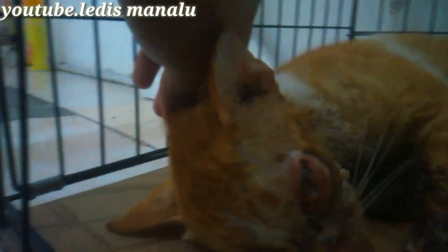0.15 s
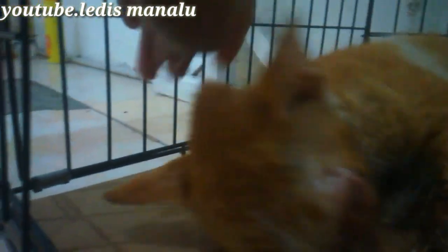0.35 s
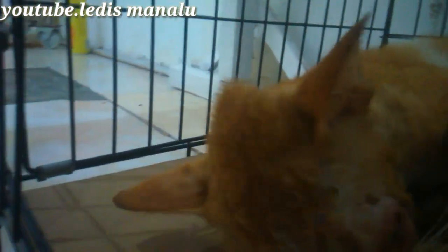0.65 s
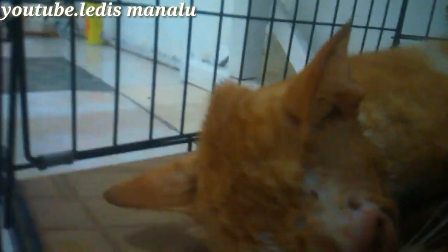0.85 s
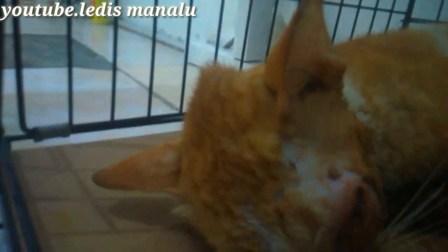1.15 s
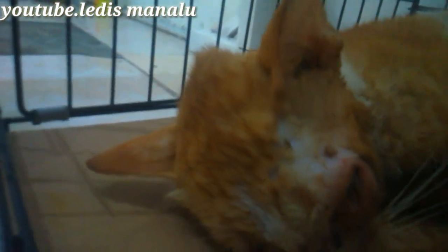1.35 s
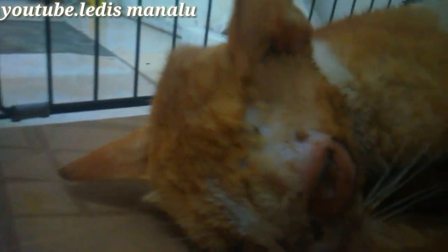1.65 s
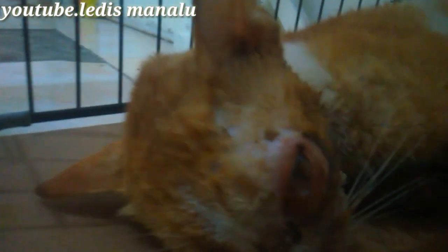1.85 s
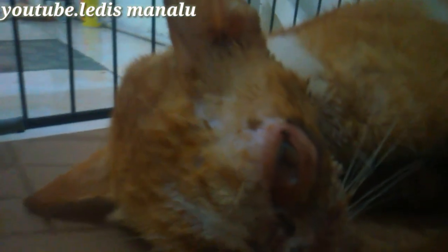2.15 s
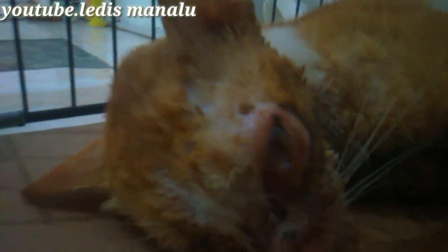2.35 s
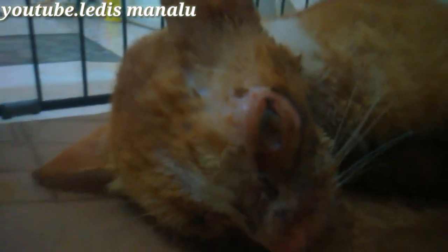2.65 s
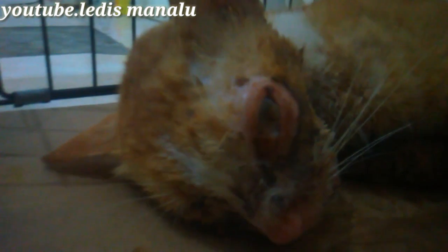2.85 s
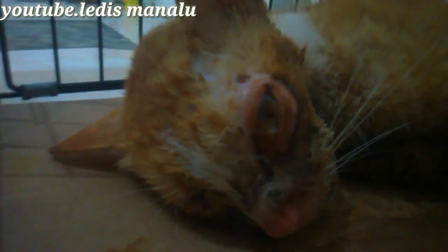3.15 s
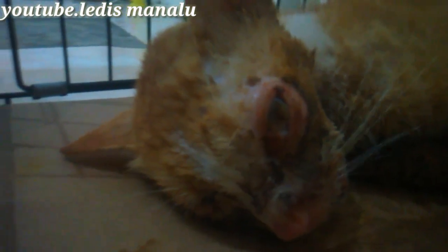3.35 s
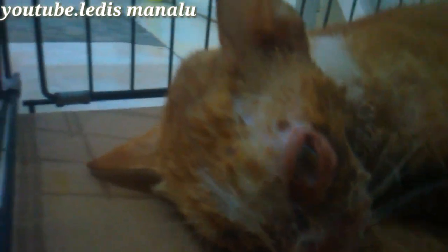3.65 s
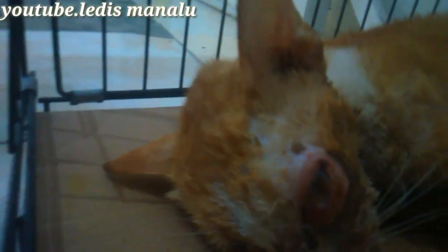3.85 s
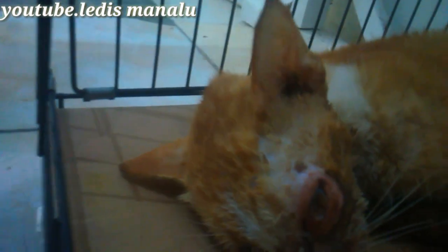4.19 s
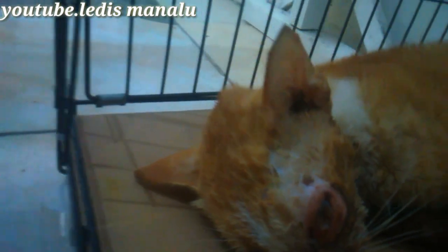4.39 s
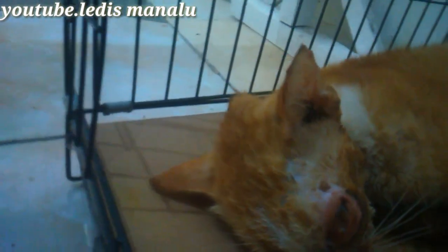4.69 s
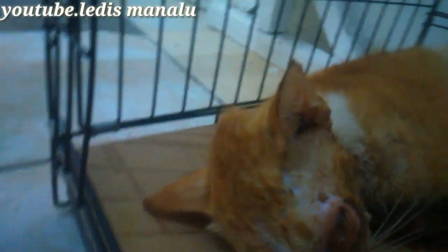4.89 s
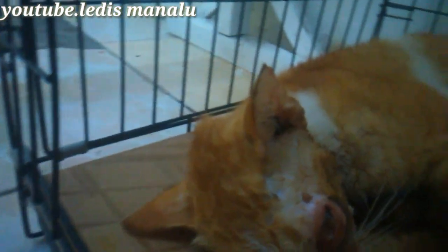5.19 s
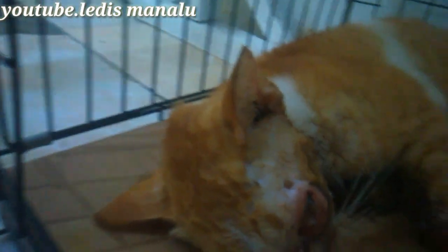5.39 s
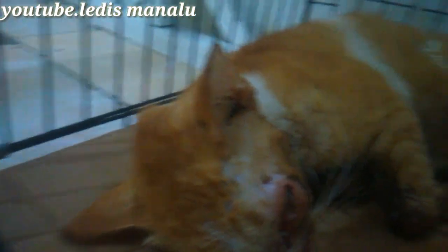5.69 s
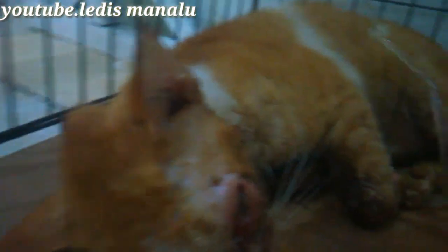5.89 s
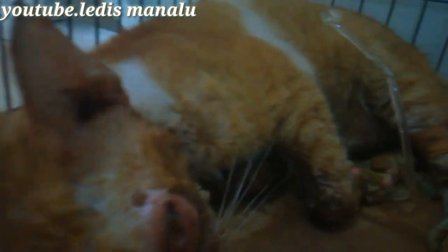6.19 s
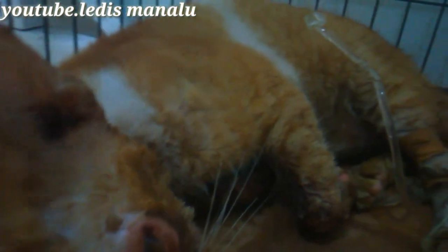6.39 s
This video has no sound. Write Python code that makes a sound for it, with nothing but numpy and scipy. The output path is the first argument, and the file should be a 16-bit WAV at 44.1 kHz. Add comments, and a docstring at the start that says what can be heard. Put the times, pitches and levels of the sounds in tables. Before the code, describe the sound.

A close stereo pickup of a cat's purr in a hard-floored room: a deep, rapid throb of over twenty pulses a second, much like an idling diesel. From 0 to 1.5 s it is moderate and fluttering, with short dips and soft bright brushes at about 0.7, 1.1 and 1.2 s. Tiny wire clicks fall at 1.5 and 1.6 s, with dull bumps at 1.6 and 1.8 s amid brief low surges. From 2 s the pulse speeds up and thickens; a rough whine rises, strongest around 3.3 s, with rushing mid noise and a thin whistle. After 3.8 s it slows, the hiss drops away, and a bump at 4.1 s leads into rounded low booms until about 4.9 s. It is quietest near 5 s, then quickens and the deep throb and hiss return, with a faint bump at 6.3 s before the end.

```python
"""Diesel rumble in a tiled clinic room

Beside a caged cat a low purring rumble throbs like a diesel engine outside: it speeds up and passes
with a whine, eases off for a gear change and pulls again. One shaft angle drives tones, boom and exhaust
noise; the room's low modes ring with the boom. Shaped noise makes the tyres, clatter, hiss and still air;
short noise bursts make bumps and faint ticks of fur and cage."""
import sys
import numpy as np
from scipy import signal
from scipy.fft import rfft, irfft, next_fast_len
from scipy.io import wavfile
from scipy.ndimage import uniform_filter1d, map_coordinates

SR = 44100
rng = np.random.default_rng(int(sys.argv[2]) if len(sys.argv) > 2 else 0)


def to_wav(sig):
    """Store sig (one row per channel, or 1-D mono) as 16-bit WAV at the path in sys.argv[1].

    Samples outside -1..1 are clipped; the rate is SR.
    """
    pcm = np.clip(np.atleast_2d(sig), -1, 1) * 32767
    pcm = np.round(pcm).astype(np.int16)
    wavfile.write(sys.argv[1], SR, pcm.T)  # frames by channels


N = 287973


def amp(db):
    """Decibels to linear gain."""
    return 10 ** (np.asarray(db) / 20)


def unit(x):
    """Scale to rms 1."""
    return x / np.sqrt(np.mean(x ** 2) + 1e-20)


def along(points, hz):
    """Read (hz, value) points along a log frequency axis."""
    point_hz, values = np.transpose(points)
    return np.interp(np.log(hz + 1), np.log(point_hz + 1), values)


def curves(rows, glide_s=0.006):
    """One gliding value per sample for each column after the time."""
    time_s, *columns = np.transpose(rows)
    t = np.arange(N) / SR
    return [uniform_filter1d(np.interp(t, time_s, c), int(glide_s * SR) + 1) for c in columns]


def wobble(rate_hz):
    """A smooth random curve with rate_hz knots a second."""
    knots = rng.standard_normal(int(N * rate_hz / SR) + 4)
    return map_coordinates(knots, [np.arange(N) * rate_hz / SR])


def swell(middle_s, length_s):
    """A rounded rise and fall: half a cosine over the length."""
    return np.cos(np.pi * np.clip((np.arange(N) / SR - middle_s) / length_s, -.5, .5))


def filtered(x, response):
    """Filter x by a complex response of frequency, zero-padded against wrap-around."""
    m = next_fast_len(N + SR // 2)
    return irfft(rfft(x, m) * response(np.fft.rfftfreq(m, 1 / SR)), m)[..., :N]


def coloured(x, spectrum):
    """Shape x by a spectrum and bring it to rms 1."""
    return unit(filtered(x, lambda hz: amp(along(spectrum, hz))))


def diffuse():
    """Stereo room noise: alike in the bass, mostly unrelated in the treble."""
    # left-right likeness: pitch_hz [Hz], correlation [0 to 1]
    likeness = [(60, 1), (130, 0.93), (290, 0.75), (640, 0), (1400, 0.34), (3000, 0), (15000, 0.034)]

    def mid_side(hz):
        turn = np.arccos(np.clip(along(likeness, hz), -1, 1)) / 2
        return np.array([np.cos(turn), np.sin(turn)])

    mid, side = filtered(rng.standard_normal((2, N)), mid_side)
    return np.array([mid + side, mid - side])


def steadied(x, seconds):
    """Even out the level of x to about 1 over spans longer than the given time."""
    power = uniform_filter1d(np.mean(x ** 2, axis=0), max(int(seconds * SR), 64))
    return x / np.sqrt(np.abs(uniform_filter1d(power, SR // 50)) + 1e-9)


def narrow(phase, half_width_hz):
    """Stereo noise of rms 1 in a narrow band: slow random signals modulate a tone."""
    def slow():
        return filtered(rng.standard_normal((3, N)), lambda hz: 1 / (1 + (hz / half_width_hz) ** 4))

    left, right, both = slow() * np.cos(phase) + slow() * np.sin(phase)
    return unit(np.array([left + both, right + both]))


def patchy(x, depth_db, size=1024):
    """Let narrow time-frequency patches of x come and go at random."""
    z = signal.stft(x, nperseg=size)[2]
    field = uniform_filter1d(rng.standard_normal(z.shape[1:]), size=3, axis=0)
    field = uniform_filter1d(field, size=14, axis=1)
    return signal.istft(z * amp(depth_db * unit(field)), nperseg=size)[1][:, :N]


def bursts(rows, attack_s):
    """Envelope of short exponentially dying bursts, one per (start, level, t60) row."""
    t = np.arange(SR // 4) / SR
    envelope = np.zeros(N + SR)
    for start_s, level_db, t60_s in rows:
        shape = amp(level_db - 60 * t / t60_s) * (1 - np.exp(-t / attack_s))
        envelope[round(start_s * SR):][:len(t)] += shape
    return envelope[:N]


def puffs(angle, depth_db):
    """Noise that swells once with each turn of the shaft."""
    return diffuse() * amp(depth_db * np.cos(angle))


def cycle(angle, size=128):
    """A random exhaust waveform that comes back every two turns of the shaft."""
    pattern = rng.standard_normal(size)
    return unit(map_coordinates(pattern, [angle / (4 * np.pi) % 1 * size], mode="grid-wrap"))


def beats(angle, scatter_db, count=256):
    """Random strength for each turn of the shaft, gliding from one to the next."""
    return amp(scatter_db * np.interp(angle / (2 * np.pi), np.arange(count), rng.standard_normal(count)))


def low_orders(angle, flutter_db=1.64):
    """Exhaust tones at shaft multiples; the higher crest later, so each turn sweeps slightly upward."""
    # tones at 4, 5 and 6 times shaft speed: time_s [s], level_db [dB before flutter and beats]
    fourth_levels = [(0, -48), (1.3, -47), (1.7, -34), (1.85, -27), (2.2, -45), (2.47, -40), (2.589, -16.5),
                     (2.72, -39), (3.1, -36), (3.3, -16), (3.45, -14.5), (3.62, -18.5), (3.73, -31),
                     (3.9, -31), (3.99, -18), (4.1, -41), (4.95, -44.5), (5.43, -31), (6.0, -32),
                     (6.13, -37), (6.3, -33), (6.42, -30.5), (6.53, -18)]
    fifth_levels = [(0.13, -44), (0.32, -23), (0.57, -35), (0.63, -19.5), (0.85, -24.5), (0.94, -32),
                    (1.07, -19.5), (1.17, -32.5), (1.25, -28), (1.5, -24.5), (1.57, -39.5), (1.87, -15),
                    (2.06, -28), (2.22, -20.5), (2.42, -39.5), (2.72, -20.5), (2.98, -19.5), (3.3, -31.5),
                    (4.1, -39), (4.58, -37.5), (4.75, -55), (5.1, -35), (5.35, -30.5), (6.0, -25.5),
                    (6.15, -48), (6.5, -34)]
    sixth_levels = [(0.5, -53), (0.849, -27), (1.15, -40), (1.37, -25.5), (1.58, -40), (1.84, -24.5),
                    (2.05, -46), (2.25, -27.5), (3.2, -30), (3.42, -23), (3.72, -28), (3.9, -36.5),
                    (5.45, -46.5), (5.95, -37), (6.53, -33)]
    drift = .22 * wobble(12)  # radians, shared by all three
    tones = 0
    for order, levels in zip((4, 5, 6), (fourth_levels, fifth_levels, sixth_levels)):
        level_db, = curves(levels)
        phase = order * angle + drift - .4 * (order - 5) ** 2
        tones = tones + amp(level_db + flutter_db * wobble(9)) * np.sqrt(2) * np.cos(phase)
    return tones


def room(hz):
    """The room's low-frequency response: a sum of resonant modes with alternating sign."""
    # room modes: pitch_hz [Hz], width_hz [Hz], level_db [dB]
    modes = [(51.2, 2.8, -12.5), (75.6, 17, -12), (104.1, 10.8, -4.5), (114.06, 2.3, 3.5),
             (127.05, 1.33, -3), (134.8, 2.3, -3), (152.4, 7.3, -4), (169, 34, -9.5), (203.4, 15.2, -8)]
    return sum((-1) ** k * amp(db) * 1j * hz * w / (c * c - hz * hz + 1j * hz * w)
               for k, (c, w, db) in enumerate(modes))


def boom(angle, top_hz=170):
    """Uneven exhaust puffs ring the low modes of the room and flutter with the shaft."""
    ringing = filtered(puffs(angle, depth_db=4.5), lambda hz: room(hz) / (1 + (hz / top_hz) ** 4))
    flutter = unit(1 + .35 * np.cos(angle))
    return steadied(ringing, seconds=0.035) * flutter


def rumble(angle, scatter_db=1.4, tones_db=-0.1, boom_db=2.0):
    """Clean tones over a loose boom; shared turn-by-turn strength and brief dips make both falter."""
    # loose boom: time_s [s], level_db [dB before trim and beats]
    boom_levels = [(0, -31.5), (0.1, -42), (0.3, -31), (1.5, -30), (1.6, -29), (1.72, -26.5), (2.45, -29.5),
                   (3.2, -25.5), (3.7, -30), (3.9, -28.5), (4.1, -34.5), (4.22, -30), (4.59, -34.5),
                   (4.78, -36), (4.89, -38), (5.05, -36), (5.14, -32), (5.4, -35), (6.0, -29),
                   (6.15, -40.5), (6.3, -31.5)]
    # brief level changes, nearly all dips: middle_s [s], half_width_s [s, to 1/e], change_db [dB]
    dips = [(0.575, 0.017, -3.5), (0.935, 0.015, -1.5), (1.16, 0.023, -12), (1.56, 0.016, -10),
            (1.628, 0.022, -14), (1.775, 0.01, -9), (3.71, 0.024, 0.5), (4.17, .018, -5), (4.505, .018, -7),
            (4.78, 0.022, -9), (5.06, 0.023, -7)]
    level_db, = curves(boom_levels)
    t = np.arange(N) / SR
    dip_db = sum(db * np.exp(-((t - s) / width) ** 2) for s, width, db in dips)
    mix = amp(tones_db) * low_orders(angle) + amp(level_db + boom_db) * boom(angle)
    return amp(dip_db) * beats(angle, scatter_db) * mix


def firing(angle, trim_db=2):
    """Two firings a turn make one deep sine that wavers a little in phase."""
    # deep firing tone: time_s [s], level_db [dB before trim]
    firing_levels = [(0.0, -62), (0.58, -33), (0.82, -54), (1.68, -32), (2.22, -32), (2.37, -56),
                     (3.46, -33), (3.69, -55), (4.1, -39), (4.22, -27), (4.42, -30), (4.75, -46),
                     (4.97, -41.5), (5.15, -27.5), (6.15, -23.5), (6.53, -38)]
    level_db, = curves(firing_levels)
    phase = 2 * angle + rng.uniform(0, 2 * np.pi) + 0.19 * wobble(10)
    return amp(level_db + trim_db) * np.sin(phase)


def exhaust_drone(angle, pattern_db=-11.0, trim_db=-1.5):
    """Shaft-pulsed noise plus a repeating two-turn pattern, coloured and held even in level."""
    # drone level: time_s [s], level_db [dB before trim and wobble]
    drone_levels = [(0.0, -39), (0.9, -37), (1.35, -31.5), (1.9, -29.5), (2.4, -31.5), (3.1, -31),
                    (3.35, -28.5), (4.1, -36.5), (4.3, -39), (4.8, -39), (5.22, -46.5), (5.38, -37.5),
                    (5.75, -36.5), (6.1, -42.5), (6.53, -38)]
    # drone colour: pitch_hz [Hz], relative level_db [dB]
    drone_colour = [(150, -7.5), (205, -1.5), (240, -0.5), (275, 2.5), (305, -0.5), (335, -8.5),
                    (420, -16.5), (700, -76)]
    level_db, = curves(drone_levels)
    exhaust = puffs(angle, depth_db=3.5) + amp(pattern_db) * cycle(angle)
    drone = steadied(coloured(exhaust, drone_colour), seconds=0.28)
    return amp(level_db + trim_db + 1.77 * wobble(15)) * drone


def tyre_noise(angle, strength_db, pattern_db=-11.0):
    """Patchy road noise with a trace of exhaust pattern, following the traffic's strength."""
    # tyre level: average_db [dB at average strength], slope [dB per dB of strength]
    road_level = (-40, 1.234)
    # road colour: pitch_hz [Hz], relative level_db [dB]
    road_colour = [(230, -52), (340, -3.5), (550, -1.5), (660, -1.5), (850, -1.5), (1100, -11), (1500, -13),
                   (2200, -29.5), (4000, -48), (9000, -79)]
    average_db, slope = road_level
    level_db = average_db + slope * strength_db + 0.72 * wobble(14)
    source = diffuse() + amp(pattern_db) * cycle(angle)
    return amp(level_db) * coloured(patchy(source, depth_db=2.5), road_colour)


def engine_clatter(angle):
    """Patchy mid-band noise that pulses lightly with the shaft."""
    # clatter level: time_s [s], level_db [dB]
    clatter_levels = [(0, -53), (0.8, -50), (1.55, -48), (2.0, -49), (3.1, -44), (3.7, -45), (4.2, -52.5),
                      (4.75, -57), (5.3, -53), (5.8, -49), (6.53, -51)]
    # clatter colour: pitch_hz [Hz], relative level_db [dB]
    clatter_colour = [(600, -41), (1100, 2), (1800, 1), (2400, -4.5), (2950, -5.5), (3500, -13.5),
                      (5000, -20.5), (9000, -46), (14000, -64)]
    level_db, = curves(clatter_levels)
    return amp(level_db) * coloured(patchy(puffs(angle, depth_db=0.86), depth_db=3.0), clatter_colour)


def hiss(angle, trim_db=4.5):
    """Thin treble noise, barely pulsed by the shaft, that sinks while the engine eases off."""
    # treble level: time_s [s], level_db [dB before trim and wobble]
    hiss_levels = [(0.0, -57), (0.27, -53), (0.45, -54), (0.74, -52), (0.95, -56), (2.0, -58), (2.93, -51),
                   (3.86, -54.5), (4.29, -73), (4.76, -67), (4.95, -70), (6.2, -51), (6.53, -57.5)]
    # hiss colour: pitch_hz [Hz], relative level_db [dB]
    hiss_colour = [(1500, -1), (3000, 0.5), (3900, -3), (4800, -2.5), (7000, 0), (9000, 2.5), (11000, 2.5),
                   (11800, -3), (12500, -22), (15500, -23)]
    level_db, = curves(hiss_levels)
    return amp(level_db + trim_db + 0.68 * wobble(12.0)) * coloured(puffs(angle, depth_db=.5), hiss_colour)


def hollow(trim_db=-4.5, centre_hz=935):
    """A hollow, airy noise band that comes and goes and flickers in level."""
    # hollow band: time_s [s], level_db [dB before trim and wobble]
    hollow_levels = [(0.0, -51), (0.6, -42.5), (1.65, -43), (2.1, -65), (3.0, -50), (4.44, -46.5),
                     (4.495, -35.5), (4.55, -44), (5.25, -51), (6.05, -41.5), (6.53, -45)]
    level_db, = curves(hollow_levels)
    band = narrow(2 * np.pi * centre_hz * np.arange(N) / SR, half_width_hz=102)
    return amp(level_db + trim_db + 2.95 * wobble(20)) * band


def room_floor(air_db=-53, sub_db=-60, hum_hz=399, hum_start_db=-46.5, hum_fade_db_per_s=2.5):
    """Still air, the deepest rumble and a faint narrow-band hum that wavers and slowly fades."""
    # still air colour: pitch_hz [Hz], relative level_db [dB]
    air_colour = [(150, -36), (300, -19), (450, -12.5), (650, -14), (950, -2), (1250, -6), (2000, -31),
                  (3000, -19), (4000, -24.5), (8000, -36), (12000, -43), (15600, -68)]
    t = np.arange(N) / SR
    hum_db = hum_start_db - hum_fade_db_per_s * t + 2.0 * wobble(3.9)
    hum = amp(hum_db) * narrow(2 * np.pi * hum_hz * t, half_width_hz=3.4)
    sub = amp(sub_db) * coloured(diffuse(), [(10, -15), (30, -5), (60, 9), (150, -58), (500, -120)])
    return amp(air_db) * coloured(diffuse(), air_colour) + hum + sub


def ticks(trim_db=-2.0, left_db=2.5):
    """Soft brushes against fur: short bright noise bursts, a little to the left."""
    # brushes: start_s [s], level_db [dB before attack and trim], t60_s [s]
    brushes = [(0.695, -42, 0.09), (0.768, -39, 0.09), (1.057, -41, 0.034), (1.215, -46.5, 0.31),
               (5.085, -56, .2)]
    # brush colour: pitch_hz [Hz], relative level_db [dB]
    brush_colour = [(800, -9), (2000, 3), (3300, 8), (5500, 10), (10000, 16), (12000, 11), (15500, -12)]
    sides = amp([[trim_db + left_db], [trim_db - left_db]])
    return sides * bursts(brushes, attack_s=0.004) * coloured(diffuse(), brush_colour)


def clicks():
    """Cage wire clicks: very short, bright noise bursts."""
    # wire clicks: start_s [s], level_db [dB before attack], t60_s [s]
    wire_clicks = [(1.5065, -32, .012), (1.509, -28.5, 0.013), (1.623, -37, 0.023)]
    # click colour: pitch_hz [Hz], relative level_db [dB]
    wire_colour = [(600, 2), (1500, 12), (2400, 1), (3300, 2), (4200, 9), (4800, 5), (5600, -3),
                   (7300, -1.5), (11000, 4), (15500, -25)]
    return bursts(wire_clicks, attack_s=0.0004) * coloured(diffuse(), wire_colour)


def bumps(trim_db=-4):
    """A few dull bumps: bursts of steadied low noise that stand out of the drone."""
    # bumps: start_s [s], level_db [dB before attack and trim], t60_s [s]
    bump_rows = [(1.579, -14, 0.085), (1.795, -21, 0.093), (4.11, -20.5, 0.22), (6.28, -27.5, .14)]
    # bump colour: pitch_hz [Hz], relative level_db [dB]
    dull_colour = [(120, -17), (210, -0.5), (280, -6.5), (420, -25), (900, -21), (2500, -64)]
    noise = steadied(coloured(diffuse(), dull_colour), seconds=0.026)
    return amp(trim_db) * bursts(bump_rows, attack_s=0.0016) * noise


def whine(angle, trim_db=0.56):
    """A rough gear whine: a gliding noise band that swells with the pull and throbs with the shaft."""
    # gear whine: time_s [s], pitch_hz [Hz], level_db [dB before trim]
    whine_path = [(1.6, 706, -73), (1.85, 715, -54), (2.12, 726, -39), (2.55, 753.5, -41),
                  (2.78, 770, -34.5), (3.08, 777.4, -34.5), (3.33, 804, -28.5), (3.42, 785.5, -40),
                  (3.56, 785.6, -33.5), (3.75, 797, -61), (4.1, 775.7, -66)]
    pitch_hz, level_db = curves(whine_path)
    band = steadied(narrow(2 * np.pi * np.cumsum(pitch_hz) / SR, half_width_hz=13), seconds=0.036)
    throb = (1 + .55 * np.cos(angle)) * beats(angle, scatter_db=2)
    return amp(level_db + trim_db) * unit(band * throb)


def surges():
    """Single low sine booms that swell and die as the engine labours or eases off."""
    # surges: middle_s [s], length_s [s], pitch_hz [Hz], level_db [dB rms at the crest]
    surge_rows = [(1.671, 0.035, 108, -22), (1.711, .03, 112, -21), (1.756, .036, 111, -18.5),
                  (4.228, 0.075, 108, -21.5), (4.293, .05, 106, -21.5), (4.36, 0.076, 101, -24.5),
                  (4.45, 0.069, 113, -21), (4.535, .04, 110, -19.5), (4.583, 0.086, 110.9, -19),
                  (4.675, 0.12, 107, -31), (4.833, .068, 105.7, -25), (4.995, 0.045, 122, -36)]
    t = np.arange(N) / SR
    return sum(amp(db) * np.sqrt(2) * swell(s, length) * np.cos(2 * np.pi * hz * (t - s))
               for s, length, hz, db in surge_rows)


def whistles():
    """Thin, fuzzy whistles: narrow noise bands that swell, break up and fade."""
    # whistles: middle_s [s], length_s [s], pitch_hz [Hz], level_db [dB before swell and wobble]
    whistle_rows = [(3.35, 1.95, 2944, -61.5), (5.15, 0.3, 2960, -65), (5.6, 0.36, 3500, -61),
                    (6.35, 0.9, 2920, -63)]
    t = np.arange(N) / SR
    tones = sum(amp(db) * swell(s, length) * narrow(2 * np.pi * hz * t, half_width_hz=47)
                for s, length, hz, db in whistle_rows)
    return tones * amp(3.5 * wobble(22))


def scene():
    """One turning shaft drives the engine layers; room, fur and cage sounds are added."""
    # shaft speed: time_s [s], speed_hz [turns per second]
    shaft_speed = [(0, 22.3), (0.55, 22.8), (1.1, 22.78), (1.42, 23.12), (1.65, 24.9), (2.25, 26.17),
                   (2.9, 27.27), (3.25, 28.29), (3.75, 29.08), (3.97, 28.42), (4.2, 25.13), (4.8, 22.99),
                   (5.2, 24.19), (6.15, 25.76), (6.53, 26.46)]
    # how strongly the traffic carries into the room: time_s [s], strength_db [dB, average removed below]
    traffic_strength = [(0.0, -44.5), (0.6, -42.5), (1.7, -40), (1.85, -40), (2.5, -39), (3.28, -35.5),
                        (3.5, -38), (3.72, -37), (3.9, -39.5), (4.4, -42), (4.7, -48), (5.55, -50.5),
                        (5.78, -45.5), (6.53, -47)]
    speed_hz, = curves(shaft_speed)
    angle = 2 * np.pi * np.cumsum(speed_hz) / SR
    strength_db, = curves(traffic_strength)
    strength_db = strength_db - strength_db.mean()
    engine = rumble(angle) + firing(angle) + surges() + whine(angle)
    rush = exhaust_drone(angle) + tyre_noise(angle, strength_db) + engine_clatter(angle) + hiss(angle)
    return engine + rush + hollow() + room_floor() + ticks() + clicks() + bumps() + whistles()


def record(dry):
    """Two slightly unequal microphones, the left one leading in phase, and a band limit."""
    # level balance: pitch_hz [Hz], left_minus_right_db [dB]
    balance = [(60, 0.5), (180, -2), (280, 5), (400, 1), (700, -0.5), (1300, 1), (2400, 0), (8000, 0.3),
               (11000, 3), (13000, 5)]
    # phase lead of the left microphone: pitch_hz [Hz], lead [radians]
    left_lead = [(30, 0.066), (120, 0.062), (300, 0.12), (780, 0.092), (1500, 2.78), (3600, 7.22)]
    # upper band limit [Hz]
    top_hz = 15600
    sides = np.array([[1], [-1]]) / 2  # half of each difference to either side

    def microphones(hz):
        gain = amp(sides * along(balance, hz))
        return gain * np.exp(1j * sides * along(left_lead, hz)) * (hz < top_hz)

    soft_ends = signal.windows.tukey(N, .003)
    return filtered(dry * soft_ends, microphones)


dry = scene()
out = record(dry)
to_wav(out)
```